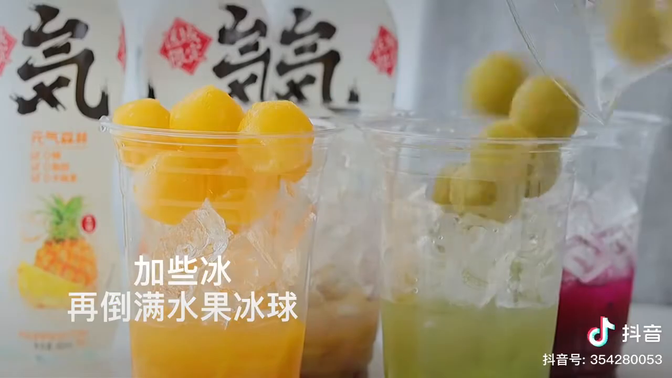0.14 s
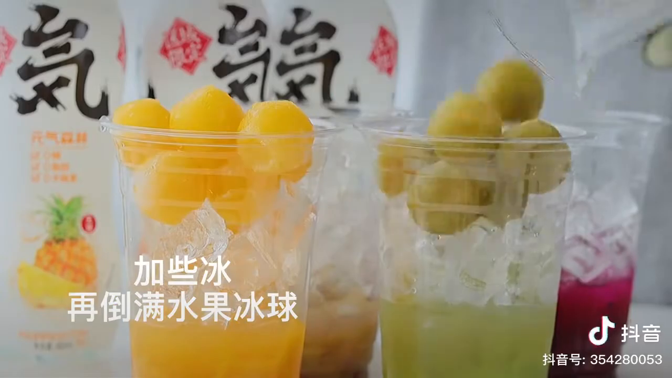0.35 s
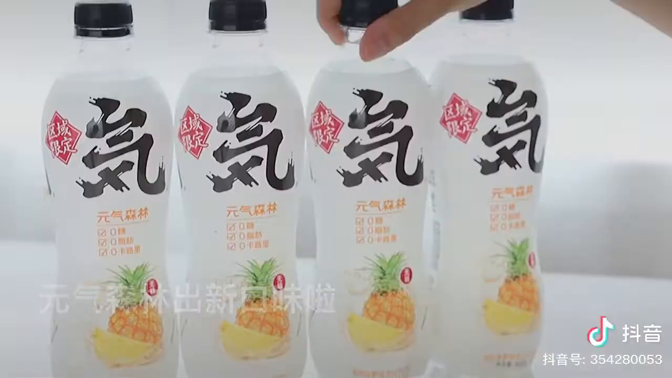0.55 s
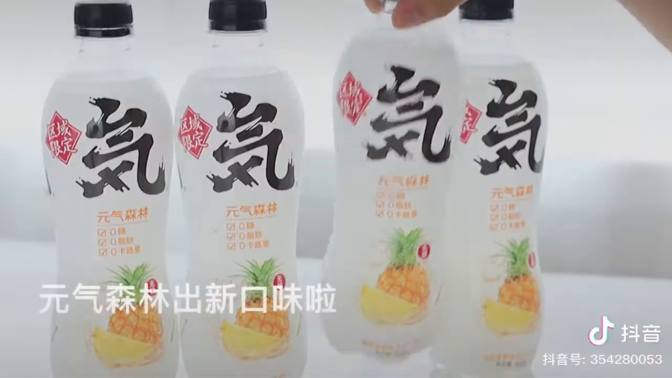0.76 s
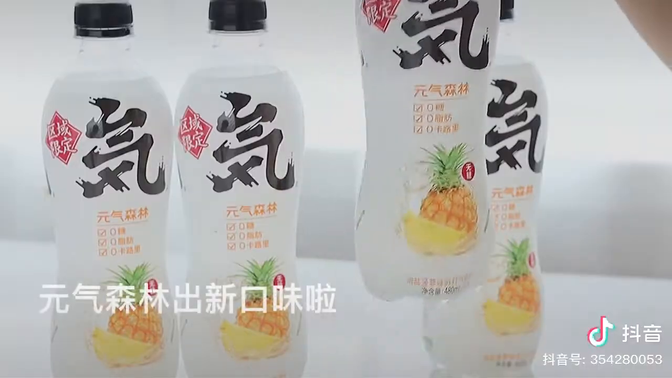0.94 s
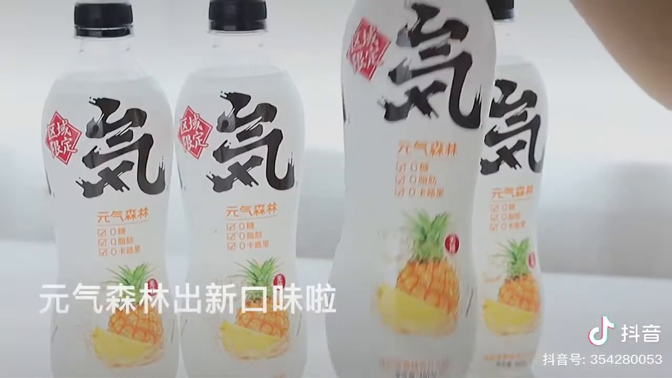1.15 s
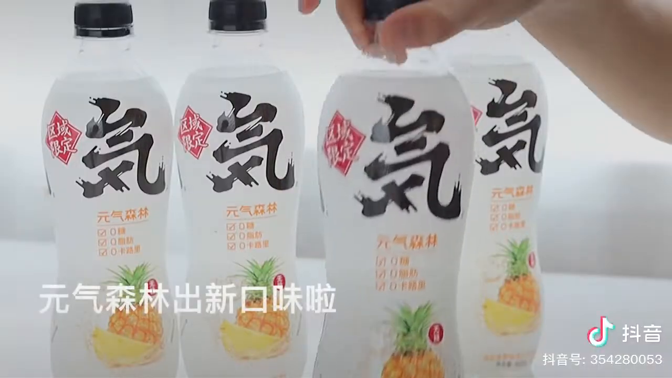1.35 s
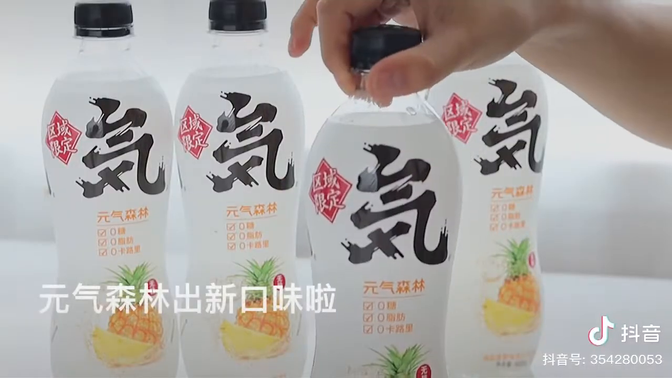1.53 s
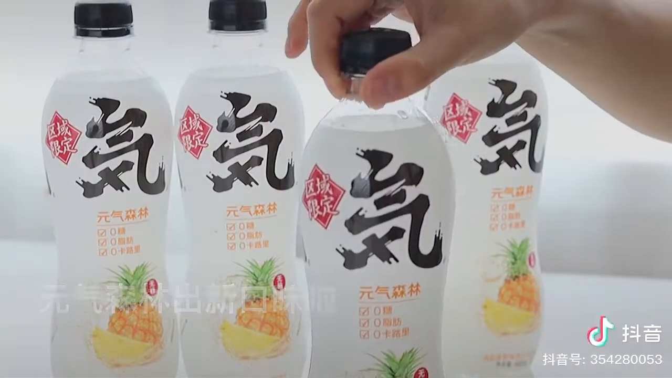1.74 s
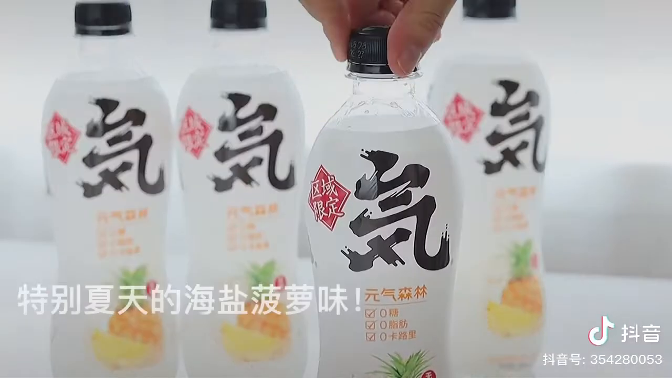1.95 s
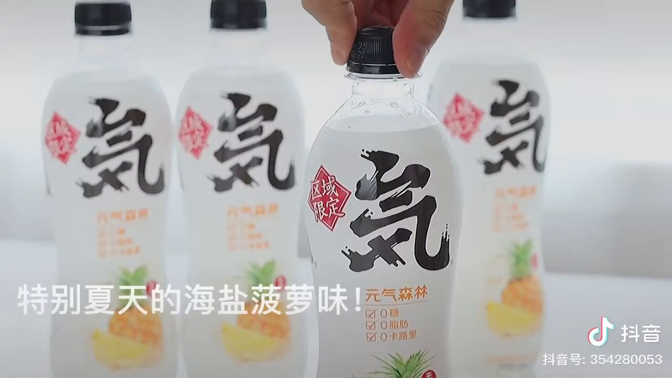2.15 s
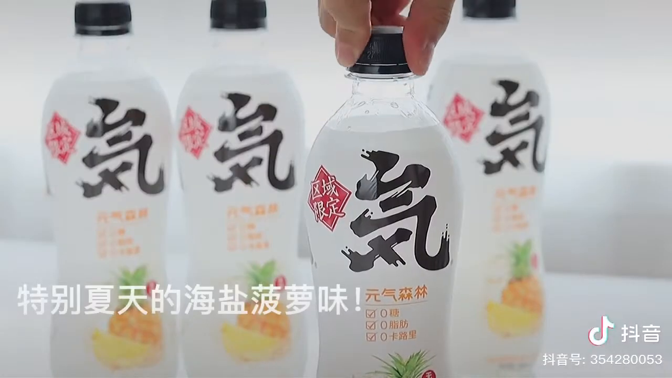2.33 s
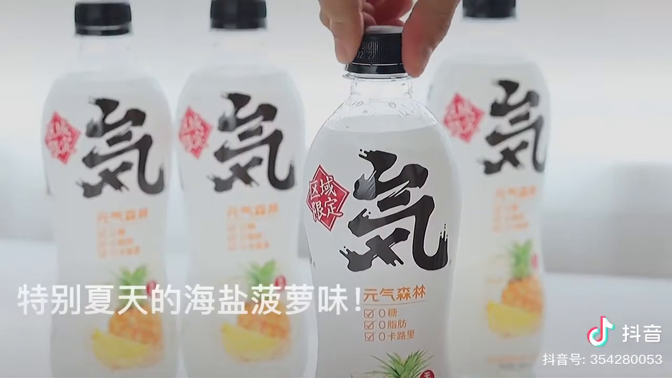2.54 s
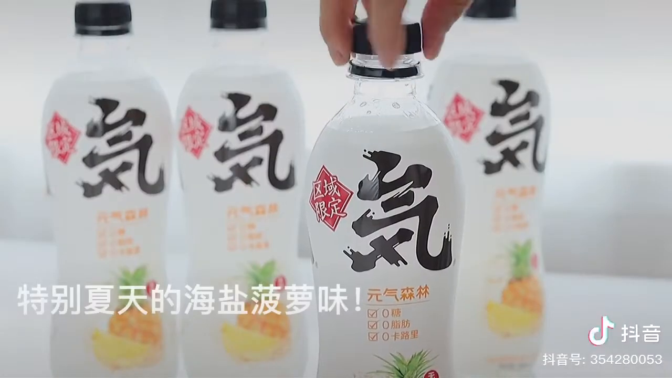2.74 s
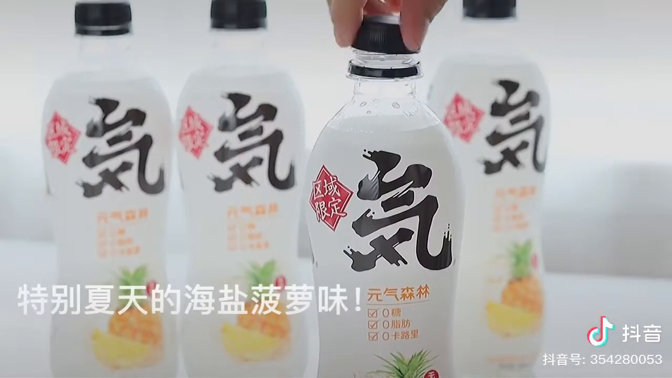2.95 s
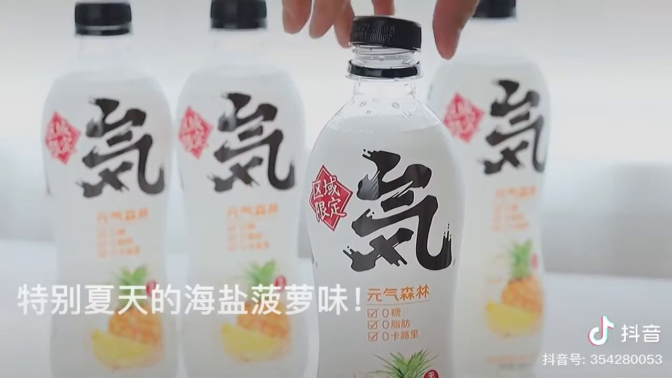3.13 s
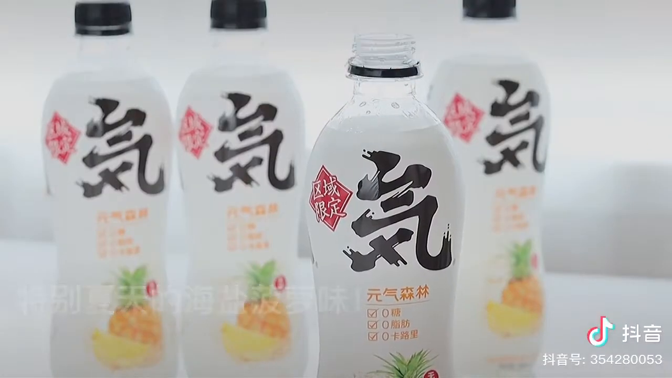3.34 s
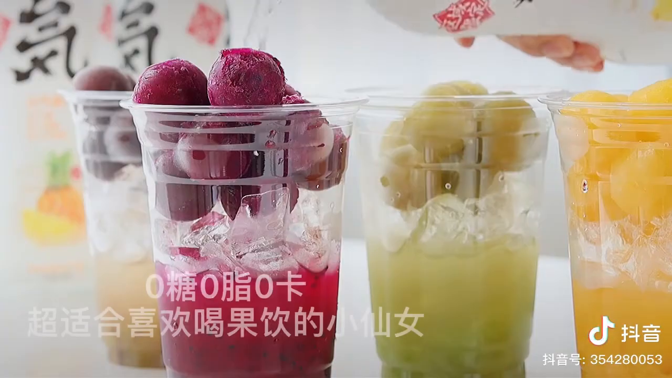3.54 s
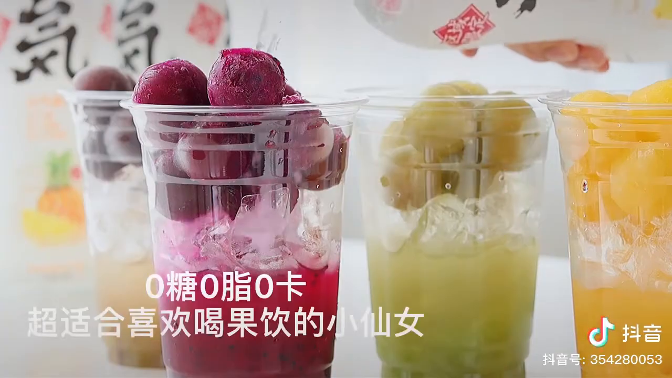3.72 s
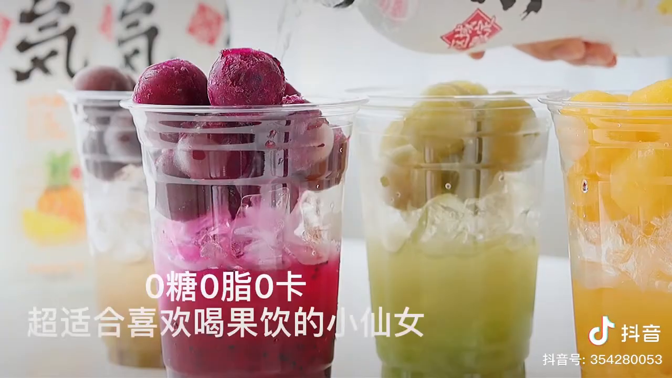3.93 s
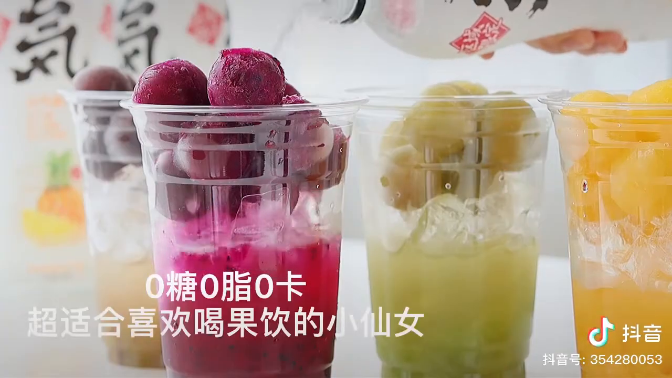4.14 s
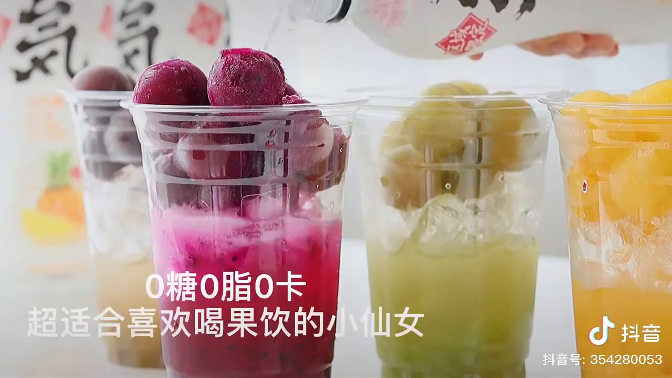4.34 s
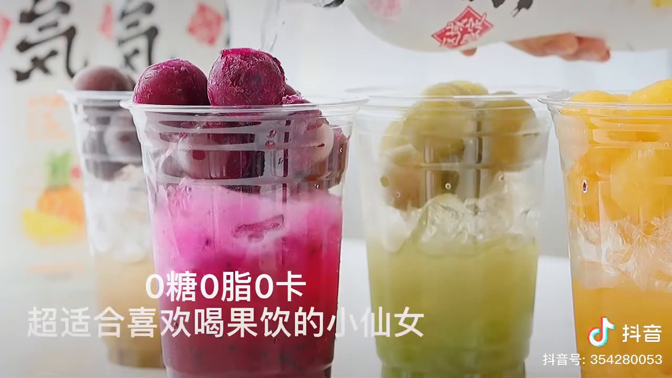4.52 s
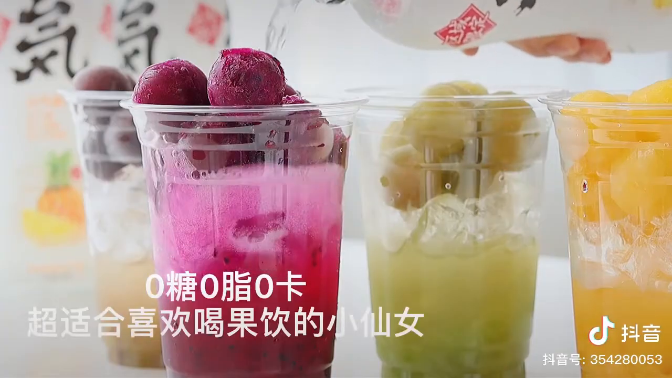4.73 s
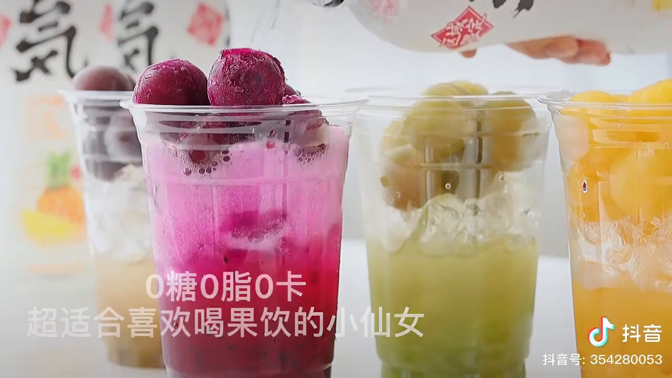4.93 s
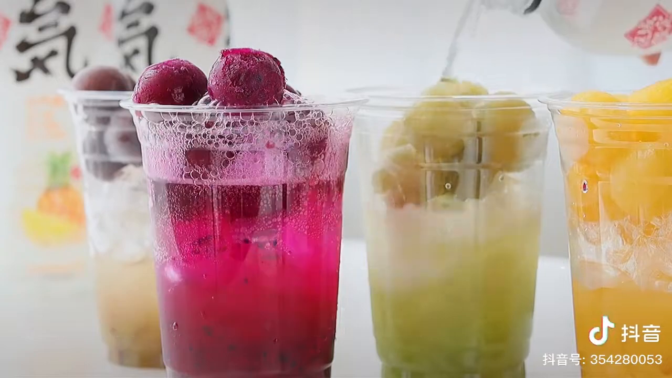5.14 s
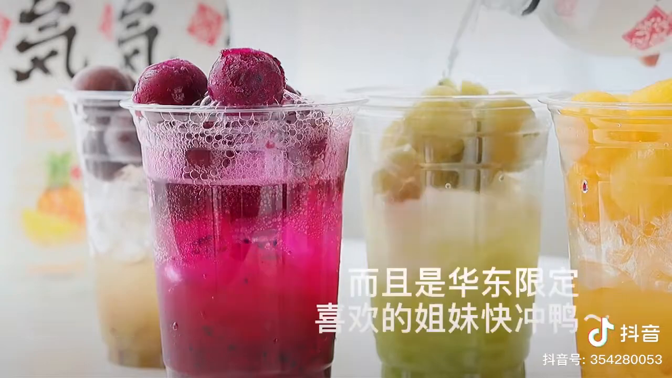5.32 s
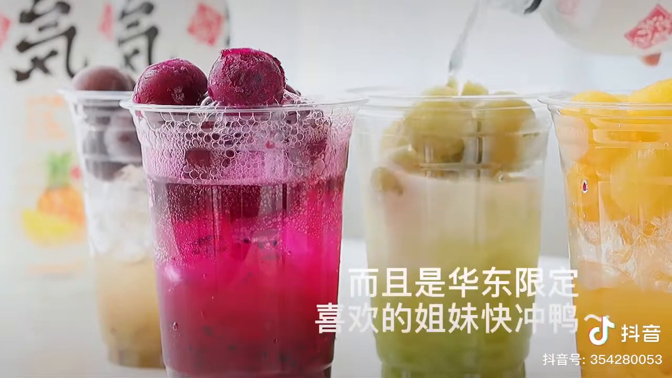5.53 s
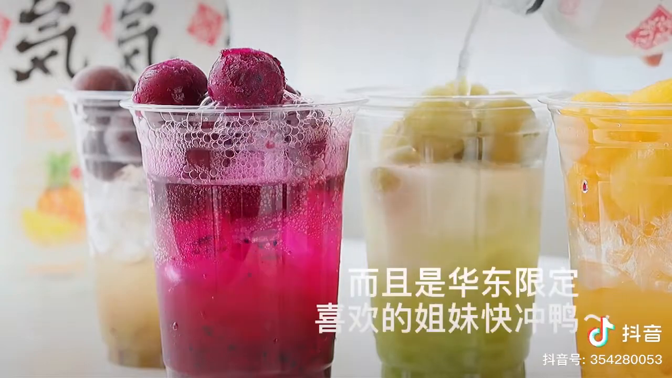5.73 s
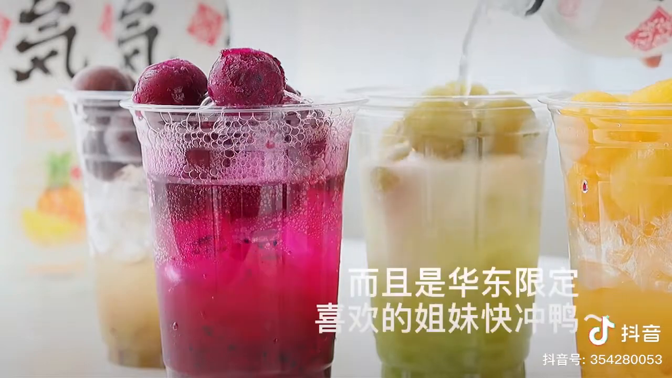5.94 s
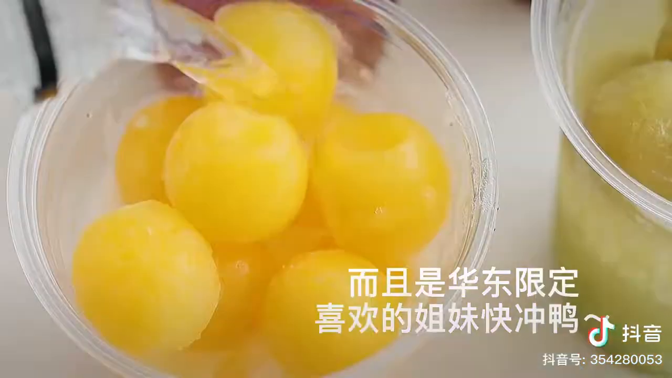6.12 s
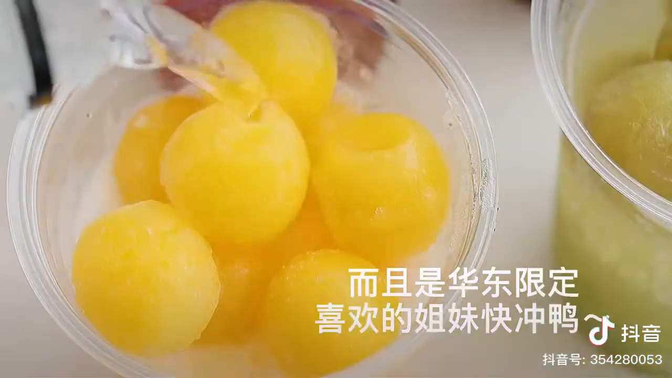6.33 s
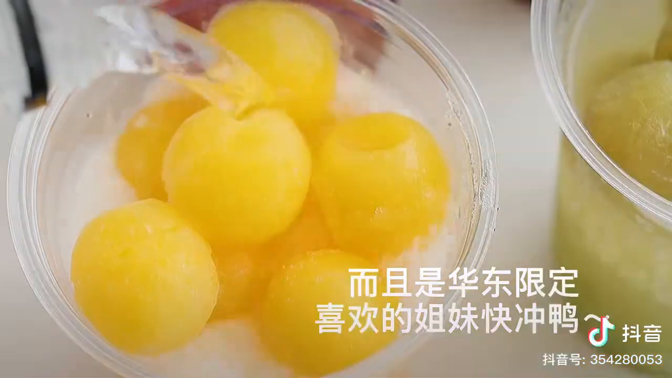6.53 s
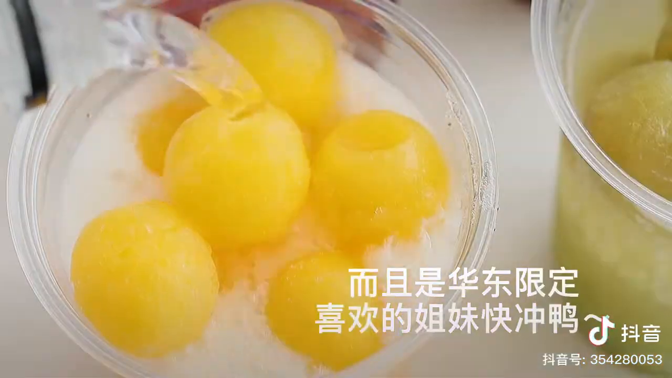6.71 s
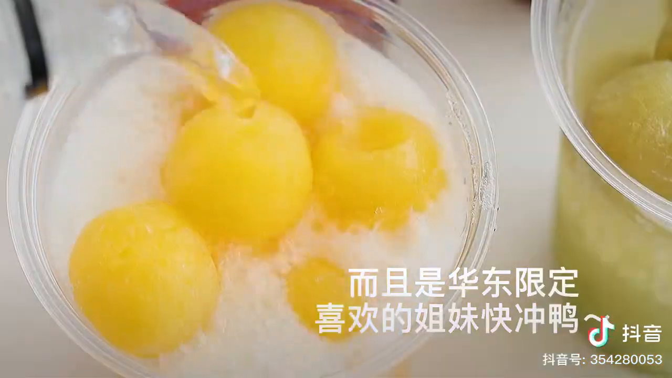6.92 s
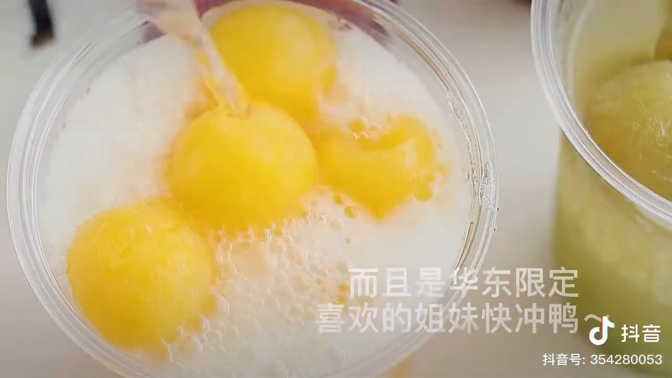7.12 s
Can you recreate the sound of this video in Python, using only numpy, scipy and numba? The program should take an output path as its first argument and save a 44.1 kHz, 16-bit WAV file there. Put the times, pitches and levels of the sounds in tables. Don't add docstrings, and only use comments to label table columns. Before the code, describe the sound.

Very close and dry, frozen fruit balls tumble into a plastic cup of ice with rapid bright knocks and boomy wall thumps. Fingers brush a bottle, it is set down with a thud, then its cap lets out a sharp hiss and cracks as the seal snaps. Sparkling water then glugs over ice in three cups, clinking, gurgling and fizzing ever more densely.

```python
import sys
import numpy as np
from scipy import signal
from scipy.fft import rfft, irfft, next_fast_len
from scipy.io import wavfile
from scipy.ndimage import uniform_filter1d, minimum_filter1d
from numba import njit

SR = 44100
rng = np.random.default_rng(int(sys.argv[2]) if len(sys.argv) > 2 else 0)


def invert_db(x):
    u = np.asarray(x, float) / 20
    return 10 ** u


def inscribe(sig):
    pcm = np.round(np.clip(np.atleast_2d(sig).T, -1, 1) * 32767)
    wavfile.write(sys.argv[1], SR, pcm.astype(np.int16))


N = 320607
TIME = np.arange(N) / SR

# f/Hz, level/dB per Hz
ROOM_TONE = [(42, 3), (62, -3.5), (95, -2), (190, -2.5), (290, -31.5), (530, -24.5), (10200, -49),
             (16000, -44)]
# f/Hz, level/dB
WHINES = [(2468, -66), (8000, -76), (10002, -66.5)]
# t/s, level/dB
RUMBLE = [(0, -28), (.9, -34), (1.51, -37.5), (1.52, -21.5), (1.76, -32.5), (1.95, -30.5), (2.4, -50.5),
          (2.5, -40), (5.3, -48.5), (7.27, -44)]
# t/s, hold/s, depth/dB, recovery/s
DUCKS = [
    (1.515, .01, -50, 0.089),
    (2.2, 0.25, -21, 0.035),
    (2.69, .55, -1, .08),
]
# t/s, fade-in/s, start level/dB
CUTS = [
    (1.762, 0.013, -27),
    (2.6, 0.024, -85),
    (3.38, 0.027, -28),
    (5.077, 0.031, -17),
    (6.022, 0.015, -67),
]

# f/Hz, width/Hz, level/dB
CUP_BODY = [(308, 56, 6.5), (619, 230, 0.5), (1030, 66, 2), (1270, 8.8, -21)]
# f/Hz, width/Hz, level/dB
BOTTLE_BODY = [(251, 76, -7), (331, 16, 5), (378, 46, -6), (545, 68, 0.5), (940, 140, -12)]
# f/Hz, width/Hz, level/dB
NECK_BODY = [(328, 19, -0.5), (385, 33, -4), (538, 38, 1.5), (605, 38, -2.5), (945, 180, -12)]
# f/Hz, width/Hz, level/dB
RUB_BODY = [(1940, 590, 5), (2850, 670, 6.5), (3190, 180, -1), (3520, 100, -9)]
# f/Hz, width/Hz, level/dB
THREAD_GAPS = [(3760, 290, -7), (3900, 70, -6), (6240, 190, -3), (7500, 160, 3), (8300, 160, 0),
               (9200, 140, 1.5), (10200, 270, -1), (11070, 140, 1.5), (14000, 250, -3)]
# f/Hz, level/dB per Hz
SKIN_COLOUR = [(300, 1.5), (1000, -2.5), (4000, 7), (6300, -11), (14000, -46)]
# f/Hz, level/dB per Hz
JET_COLOUR = [(1100, -35), (1800, -15), (3750, 1.5), (4500, -4), (5000, -16), (6800, -2), (8300, 6.5),
              (15500, 3)]
# f/Hz, level/dB per Hz
FIZZ_COLOUR = [(1400, -74), (1960, 1.5), (3190, 10), (3700, 7.5), (4680, -36), (7000, -17.5), (10000, -24),
               (13500, -22)]

# t/s, peak level/dB, ring f/Hz, crack level/dB, t60/s
FRUIT_HITS = [(0.001, -9, 1100, -44, 0.068), (0.028, -5, 1012, -13, 0.035), (0.032, -11, 3200, -9, 0.014),
              (0.059, -12.5, 1270, -25, 0.052), (0.093, -4, 3000, -12, 0.015),
              (0.103, -0.5, 2930, -12, 0.012), (0.124, -15, 775, -25, 0.027),
              (0.142, -3.5, 3060, -35, 0.023), (0.151, -9, 1020, -20, 0.048),
              (0.158, -5.5, 1030, -11, 0.018), (0.164, -3, 3470, -16, 0.014), (0.181, -9, 1270, -14, 0.1),
              (0.2121, 1, 1970, -16, 0.012), (0.231, -4.5, 2850, -24, 0.023),
              (0.262, 1.5, 1790, -16, 0.008), (0.298, -16, 2920, -20, 0.02),
              (0.328, 0.5, 1980, -11.5, 0.013), (0.334, -4.5, 2030, -15, 0.028),
              (0.367, -9, 2920, -18, 0.02), (0.387, -4.5, 2010, -14, 0.014), (0.416, 3, 1950, -16, 0.014),
              (0.441, -15, 2860, -16, 0.016)]
# t/s, hold/s, level/dB, wall boom level/dB, treble level/dB
RATTLE_SPELLS = [(0, 0.034, -18, 0, -5.5), (.06, 0.045, -24, 3, -8), (.125, 0.074, -21, 1.5, -12),
                 (.225, 0.037, -19, 0.5, -13), (.29, 0.016, -39, -4, -14), (.33, 0.045, -21, 0.5, -24),
                 (.4, 0.066, -32, -6, -17), (1.51, .003, -38, -2, -28), (1.585, 0.0086, -44, -3, -30),
                 (1.785, 0.02, -66, 31, -10), (2.63, 0.06, -24.5, -2, -35), (2.73, 0.072, -22.5, -13, -9),
                 (2.89, .005, -28, -1.5, -32), (2.99, 0.025, -35, 0, -17), (3.07, 0.027, -32.5, -10, -30),
                 (3.19, 0.0036, -27.5, 0, -23), (3.24, 0.025, -50, 9, -3)]
# t/s, hold/s, level/dB
BRUSH_SPELLS = [
    (.64, 0.0055, -31.5),
    (1.262, 0.032, -26.5),
]
# t/s, peak level/dB, ring f/Hz, crack level/dB, body level/dB
TABLE_HITS = [
    (1.5143, -12.5, 2400, -28, -5.5),
    (1.571, -28.5, 3100, -24, 1),
    (1.579, -34, 2800, -26, -3),
    (1.589, -35, 3000, -24, 1),
    (1.783, -34.5, 704, -30, 5),
    (1.911, -24.5, 3070, -8, -12),
]
# t/s, jet level/dB
GAS_FLOW = [(1.96, -52), (1.98, -33), (2.03, -26), (2.09, -11.5), (2.227, -12.5), (2.42, -12), (2.46, -18),
            (2.49, -32), (2.6, -27)]
# t/s, peak level/dB, ring f/Hz, crack level/dB, body level/dB
CAP_HITS = [(2.69, 3, 2680, -36, -18), (2.6949, 3.5, 3180, -29, -22), (2.713, -5, 1650, -28, -20),
            (2.718, -2, 2700, -33, -17.5), (2.755, -2.5, 2700, -27, -14), (2.748, -7, 3460, -27, -13),
            (2.775, -7, 2600, -21, -22), (2.787, -11, 3300, -20, -18), (2.793, -1, 2100, -23, -16),
            (2.808, -2, 2850, -25, -40), (2.802, -3.5, 2540, -21, -23), (2.821, -7, 2500, -20, -20),
            (2.832, -10, 2650, -21, -32), (2.84, -4, 1640, -22, -17.5), (2.853, -8, 1840, -26, -9.5),
            (2.895, -23.5, 1300, -30, -14), (2.95, -4.5, 3020, -7, -27), (2.963, -21, 2700, -13, -14),
            (2.998, -3, 3220, -26, -21), (3.004, -5, 1690, -17, -21), (3.028, -9.5, 2800, -29, -27),
            (3.036, -9, 2770, -19, -26), (3.04, -3.5, 2620, -28, -19), (3.063, -14, 2570, -27, -27),
            (3.071, -12, 2640, -33, -13), (3.167, -22, 2900, -17, -22), (3.178, -9, 3320, -29, -17.5),
            (3.199, -11.5, 2640, -36, -14)]
# t/s, peak level/dB, f/Hz
SNAPS = [
    (.2635, -8, 2200),
    (.4175, -5, 2400),
    (2.6918, -4, 2900),
    (2.7192, -6, 2900),
    (2.9521, 1, 2930),
    (3.0055, -3, 2600),
    (3.0412, -2, 3000),
]

# t/s, peak level/dB, ring f/Hz, crack level/dB
ICE_HITS = [(3.5414, -23, 3980, -5), (3.5628, -9, 2630, -20), (3.5987, -5.5, 3700, -23),
            (3.6192, -12, 3750, -17), (3.6630, 1, 3650, -36), (3.606, -8, 4000, -22),
            (3.627, -18, 2590, -20), (3.643, -13, 3220, -22), (3.675, -14, 3300, -25),
            (3.725, -17, 1710, -30), (3.755, -15, 1620, -32), (3.811, -16, 2290, -25),
            (3.875, -17, 3280, -25), (3.891, -17.5, 1800, -25), (3.97, -11, 3100, -25),
            (3.987, -23, 1700, -25), (4.451, -9, 2020, -25), (4.816, -14.5, 2210, -25),
            (3.6685, -4, 3600, -34), (3.719, -7, 2300, -30), (3.739, -9, 3000, -27),
            (3.819, -14, 2490, -25), (3.6865, -2, 3580, -32), (3.7015, 7, 3170, -30),
            (3.7125, 5, 3220, -36), (3.7494, 5, 3230, -36), (3.8496, -8, 3800, -24),
            (3.8631, -6, 3860, -32), (3.9255, 0.5, 3370, -24), (3.936, -10, 3180, -25),
            (4.281, -10, 3200, -25), (4.304, -11, 3250, -8), (4.611, -18, 1800, -19),
            (4.744, -9, 3200, -25), (4.1989, 5, 3520, -28), (4.4478, -5, 3340, -24),
            (4.5082, -9.5, 2050, -29), (4.56, -1, 3430, -29), (4.6796, -13, 3520, -4),
            (5.257, 11, 2360, -28), (5.2794, -3, 1980, -30), (6.0447, -6, 2110, -10.5),
            (6.0621, 1, 2150, -14), (6.93, -7, 2020, -25)]
# t/s, peak level/dB, f/Hz, t60/s, thud level/dB
GLUGS = [(1.52, -18.5, 152, 0.35, 1.5), (1.523, -22, 525, 0.3, -22), (1.596, -16.5, 87, 0.54, -14),
         (1.79, -22.5, 190.4, 0.31, 5), (1.793, -17, 456, 0.1, -20), (2.491, -30.5, 145.6, 0.93, -3.5),
         (3.2, -23.5, 88.7, 0.48, 4.5), (3.256, -24.5, 160.3, 0.45, -19), (3.573, -21.5, 90, 0.34, -12),
         (3.805, -20, 84, 0.29, -14), (4.056, -15.5, 85, 0.15, -14.5), (4.217, -14.5, 88, 0.17, -6),
         (4.372, -13, 84, 0.18, -2), (4.6, -25, 84.5, 0.19, -6.5), (4.807, -16, 265, 0.18, -13),
         (4.962, -25.5, 81.5, 0.19, -11), (5.296, -31.5, 142, 0.37, 4.5)]
# t/s, peak level/dB, f/Hz
CLIMBS = [
    (3.66, -29, 194.5),
    (3.92, -25.5, 196),
]
# t/s, peak level/dB, f/Hz
PLOPS = [(2.554, -31, 1220), (2.579, -26, 1030), (3.008, -6.5, 619), (3.197, -15.5, 594), (6.105, -29, 580),
         (6.19, -29, 900), (6.248, -23, 526), (6.47, -26, 634), (6.489, -24, 757), (6.511, -16.5, 683),
         (6.53, -21, 816), (6.55, -25.5, 623), (6.82, -24, 520), (6.95, -32.5, 520)]
# t/s, peak level/dB, f/Hz
GURGLES = [(3.563, -16.5, 890), (3.583, -15.5, 850), (3.605, -16, 820), (3.627, -19, 800),
           (3.649, -15.5, 837), (3.664, -16, 880), (3.702, -6.5, 836), (3.715, -4.5, 854),
           (3.749, -10, 805), (3.805, -26, 830), (3.812, -11.5, 856), (3.819, -15, 845), (3.855, -5.5, 830),
           (3.863, -10, 790), (3.882, -4, 816), (3.89, -14, 910), (3.917, -1.5, 866), (3.936, -7, 860),
           (3.947, -11, 883), (3.974, -21, 869), (4.012, -13, 730), (4.032, -18, 756), (4.11, -11, 648),
           (4.16, -23, 711), (4.178, -19, 710), (4.217, -22, 907), (4.264, -22, 891), (4.281, -13, 865),
           (4.356, -25, 573), (4.373, -15.5, 517), (4.413, -19, 890), (4.451, -13.5, 920),
           (4.475, -17, 880), (4.498, -14, 710), (4.507, -12, 714), (4.523, 0.5, 728), (4.537, -22, 770),
           (4.561, -27, 754), (4.61, -18, 646), (4.661, -22, 818), (4.676, -5.5, 726), (4.691, -20, 748),
           (4.73, -16.5, 740), (4.798, -29, 738), (4.817, -15.5, 740), (4.991, -26, 816), (5.004, -24, 549)]
# t/s, peak level/dB, f/Hz
PINGS = [(3.450, -11, 14600), (3.481, -32, 7770), (3.519, -24, 11800), (3.534, -24, 7160),
         (3.626, -19, 13240), (3.778, -16, 11000), (3.741, -21, 12400), (3.925, -23, 9290),
         (4.586, -21, 14000), (4.61, -24, 10500), (4.68, -5, 6960), (4.691, -17, 13500), (4.72, -18, 13500),
         (4.982, -16, 11000), (4.998, -14, 12100), (5.095, -21, 7020), (6.046, -20, 6520),
         (6.138, -9, 12300)]
# t/s, peak level/dB, f/Hz
SQUIRTS = [
    (5.022, -8, 3360),
    (3.9, -11, 3000),
    (5.157, -10, 1500),
]
# t/s, foam level/dB, stream level/dB
POUR = [(3.4, -52, -81), (3.52, -49, -76.5), (3.56, -26, -53), (3.76, -33, -33), (3.9, -26.5, -41),
        (4.17, -26, -46), (4.22, -22.5, -33.5), (4.6, -21.5, -28.5), (4.8, -19.5, -41), (5.07, -20, -43),
        (5.2, -24, -27), (5.45, -19, -32.5), (6.02, -14.5, -39), (6.1, -19.5, -24), (6.3, -16.5, -34),
        (6.55, -13, -30.5), (7.27, -14.5, -29)]
# t/s, fizz f/Hz, gurgle f/Hz
FILL = [(3.4, 3870, 847), (4.13, 3560, 709), (5.07, 3300, 774), (5.6, 2850, 933), (6.2, 2460, 710),
        (6.53, 2560, 764), (7.27, 2800, 816)]
# start t/s, spray level/dB, spray missing before foam builds level/dB, gurgle level/dB
CUPS = [
    (3.54, -27, -17.5, -36),
    (5.077, -26, 2, -47),
    (6.025, -22.5, -8, -43),
]
FINEST_MIST_DB = [-1, -3.5, 0]


def unit(x):
    return x / np.sqrt(np.mean(x ** 2))


def noise():
    return rng.standard_normal(N)


def band(x, lo_hz, hi_hz):
    return signal.sosfilt(signal.butter(2, [lo_hz, hi_hz], "band", fs=SR, output="sos"), x)


def colour(x, points, lo_hz=0.99, hi_hz=30000.):
    size = next_fast_len(N)
    hz = np.arange(size // 2 + 1) * SR / size + 1
    f, db = np.transpose(points)
    edge = 1 / np.sqrt((1 + (lo_hz / hz) ** 12) * (1 + (hz / hi_hz) ** 12))
    gain = invert_db(np.interp(np.log(hz), np.log(f), db)) * edge
    return unit(irfft(rfft(x, size) * gain, size)[:N])


def read(table, silent_db=-120):
    s, *columns = np.transpose(table)
    out = np.full((len(columns), N), float(silent_db))
    on = (TIME >= s[0]) & (TIME <= s[-1])
    out[:, on] = [np.interp(TIME[on], s, c) for c in columns]
    return out


def patchy(rate, db):
    k = int(SR / rate)
    steps = np.repeat(rng.standard_normal(N // k + 1), k)[:N]
    return invert_db(db * uniform_filter1d(steps, k))


def grains(rate, spread_db, tail_s):
    clicks = (rng.random(N) < rate / SR) * invert_db(spread_db * rng.exponential(size=N))
    burst = signal.lfilter([1], [1, -np.exp(-1 / (tail_s * SR))], clicks)
    return unit(burst * noise())


def bursts(s, db, tail_s, rise_s):
    envelope = np.zeros(N)
    for start, gain, tail, rise in np.broadcast(s, invert_db(db), tail_s, rise_s):
        first = int(start * SR)
        t = TIME[:min(int(9 * tail * SR) + 9, N - first)]
        swell = np.minimum(t / rise, 1)
        envelope[first:][:len(t)] += gain * swell * np.exp(-np.maximum(t - rise, 0) / tail)
    return envelope * noise()


def modes(x, peaks):
    return sum(invert_db(db) * signal.lfilter(*signal.iirpeak(f, f / max(w, 10), fs=SR), x) for f, w, db in peaks)


@njit
def ring(s, hz, t60, size, glide, rise):
    out = np.zeros(N)
    for e in range(len(s)):
        i0, n = int(s[e] * SR), int(t60[e] * SR) + 2
        p = np.exp(2j * np.pi * hz[e] / SR - np.log(1000.) / n)
        turn = np.exp(2j * np.pi * hz[e] * glide[e] / SR / n)
        z, push = size[e] + 0j, 1 / (rise * SR + 1)
        for i in range(max(i0, 0), min(i0 + n, N)):
            out[i] += z.imag * min((i - i0 + 1) * push, 1.)
            z *= p
            p *= turn
    return out


def spells(table):
    rise_db_s, fall_db_s = 800, 388
    out = 0
    for s, hold, db, *layers in table:
        shape_db = np.minimum(rise_db_s * (TIME - s), 0) - fall_db_s * np.maximum(TIME - s - hold, 0)
        out = out + invert_db(db + shape_db) * invert_db(np.array([0, *layers]))[:, None]
    return out


def contact(table, cycles, soft_db=-12):
    s, db, hz = np.transpose(table)[:3]
    return cycles / hz * invert_db(-1.15 * np.maximum(db, soft_db))


def room():
    duck_db = sum(db * (TIME >= s) * np.exp(-np.maximum(TIME - s - hold, 0) / back)
                  for s, hold, db, back in DUCKS)
    whine = sum(invert_db(db + 1) * np.sin(2 * np.pi * f * TIME) for f, db in WHINES) * (TIME < CUTS[1][0])
    hiss = colour(noise(), ROOM_TONE, lo_hz=261) + invert_db(51) * whine
    rumble = invert_db(read(RUMBLE)[0] + 2) * patchy(8, 1.5) * colour(noise(), ROOM_TONE, hi_hz=335)
    return rumble + invert_db(-44 + duck_db) * hiss


def rattle():
    first_scene_ends_s = .455
    rub, boom, treble = spells(RATTLE_SPELLS) * ((TIME < first_scene_ends_s) | (TIME > 1))
    clicks = grains(3000, 1.1, 0.0014)
    walls = np.where(TIME < 1, unit(modes(clicks, CUP_BODY)), unit(modes(clicks, NECK_BODY)))
    rubbing = colour(modes(clicks, RUB_BODY), [(500, 0), (4000, 0)], hi_hz=3600)
    bright = invert_db(-4) * colour(clicks, FIZZ_COLOUR, lo_hz=5200)
    brush = spells(BRUSH_SPELLS)[0] * colour(grains(1870, 1.5, 0.0028), SKIN_COLOUR)
    return rub * rubbing + boom * walls + treble * bright + brush


def thuds():
    s, db, hz, t60, thud_db = np.transpose(GLUGS)
    return band(bursts(s, db + thud_db + 15.5, 0.13 * t60, 0.014), 42, 255)


def booms(table, body, body_db):
    s, db = np.transpose(table)[:2]
    return modes(bursts(s, db + body_db, 0.016, 0.00059), body)


def knocks(table, t60, tail_db):
    s, db, hz, crack_db = np.transpose(table)[:4]
    t60 = np.clip(t60, .002, .3)
    still = 0 * s
    peak = s + 0.001128
    main = ring(peak, hz, t60, invert_db(db), still, 0.00029)
    main += ring(peak, 1.16 * hz, 0.89 * t60, invert_db(db - 11), still, 0.00057)
    tick = ring(peak, 1.54 * hz, 0.0036 + still, invert_db(db + 0.5 * crack_db), still, 0.)
    crack = bursts(peak, db + crack_db + 6, 0.045 * t60, 0.0002)
    crack = band(band(crack, 3900, 15000), 3700, 16000)
    scatter = bursts(np.maximum(s - .001, 0), db + tail_db, 0.29 * t60, 0.0029)
    return main + tick + crack + band(band(scatter, 1530, 3900), 810, 10000)


def solids():
    fruit, cap, table = np.transpose(FRUIT_HITS), np.transpose(CAP_HITS), np.transpose(TABLE_HITS)
    thread = knocks(CAP_HITS, contact(CAP_HITS, cycles=17, soft_db=-6.5), tail_db=1)
    hits = knocks(FRUIT_HITS, fruit[-1], tail_db=-4)
    hits += thread - .8 * modes(thread, [(5460, 1400, 0)])
    hits += knocks(ICE_HITS, contact(ICE_HITS, cycles=34.4, soft_db=-2.5), tail_db=-16.5)
    hits += knocks(TABLE_HITS, contact(TABLE_HITS, cycles=4.6), tail_db=-2.5)
    wall_db = 7 - 17 * np.log2(fruit[2] / CUP_BODY[2][0])
    walls = booms(FRUIT_HITS, CUP_BODY, wall_db)
    walls += booms(CAP_HITS, NECK_BODY, 21 + cap[-1])
    walls += booms(TABLE_HITS, BOTTLE_BODY, 17.5 + table[-1])
    return hits + band(walls, 85, 2300) + rattle()


def snaps():
    flip_s = .00005

    def swing(at, db, f):
        flip = np.tanh((at - TIME) / flip_s)
        return invert_db(db) * flip * np.exp(-2 * np.pi * f * np.abs(TIME - at))

    s, db, hz = np.transpose(SNAPS)
    bare = sum(swing(at, level_db - 14, f) for at, level_db, f in SNAPS)
    slam = swing(1.5143, 6, 1300)
    return ring(s, hz, 3.2 / hz, invert_db(db + 4), 0 * s, 0.) + bare + slam


def gas():
    full_flow_db, roar_lag_s = -11, 0.021
    high_db = read(GAS_FLOW)[0]
    whistle_db = -21.5 + 0.42 * (high_db - full_flow_db) - 99 * (high_db < -99)
    roar_db = -23 + 1.76 * (np.roll(high_db, int(roar_lag_s * SR)) - full_flow_db)
    jet = noise() * patchy(60, 0.83)
    jet = jet + 0.057 * np.roll(jet, int(0.00099 * SR))
    jet = jet + invert_db(-11.5) * unit(modes(jet, THREAD_GAPS)) * patchy(24.97, 2.9)
    roar = invert_db(roar_db) * colour(jet, JET_COLOUR, hi_hz=2800)
    whistle = invert_db(whistle_db) * colour(jet, JET_COLOUR, lo_hz=3510, hi_hz=5820)
    between = invert_db((whistle_db + roar_db) / 2 - 2.5) * colour(jet, JET_COLOUR, lo_hz=2800, hi_hz=3480)
    return roar + whistle + between + invert_db(high_db) * colour(jet, JET_COLOUR, lo_hz=5940)


def pockets(table, t60, glide, rise_s):
    s, db, hz = np.transpose(table)[:3]
    t60 = np.clip(t60 + 0 * s, .003, .5)
    return ring(s - .5 * rise_s + 0.00187, hz, t60, invert_db(db + 3), glide + 0 * s, rise_s)


def gurgles():
    s, db, hz = np.transpose(GURGLES)
    t60 = 20.2 / hz
    partner = np.transpose([s, db - 14, 1.11 * hz])
    rough = band(bursts(s, db - 1, 0.0053, 0.0019), 640, 910)
    hum = bursts(s, db + 0.5, 0.014, 0.0036)
    rough += band(band(hum, 640, 980), 610, 1010)
    rings = pockets(GURGLES, t60, glide=0.036, rise_s=0.0022)
    return rings + pockets(partner, 0.47 * t60, glide=0.06, rise_s=0.0019) + rough


def trapped_air():
    air = pockets(PLOPS, contact(PLOPS, cycles=11.8), glide=0.059, rise_s=0.00392)
    pings = np.subtract(PINGS, [.0019, -2, 0])
    air += pockets(pings, t60=0.0025, glide=0.082, rise_s=0.00011)
    air += pockets(CLIMBS, t60=0.2, glide=1.58, rise_s=0.0357)
    air += pockets(GLUGS, np.transpose(GLUGS)[3], glide=0.025, rise_s=0.016)
    return air + gurgles() + thuds()


def squirts():
    tails_s, rises_s = (.02, .002, .015), (.025, .001, .004)
    return sum(modes(bursts([s], db + 8, tail, rise), [(hz, 600, 0)])
               for (s, db, hz), tail, rise in zip(SQUIRTS, tails_s, rises_s))


def bubbles(hz, count, spread, cycles, size_db, glide=0.26):
    when, detune, length, size = rng.random((count, 4)).T
    s = 3.4 + when * (N / SR - 3.4)
    pitch = hz[(s * SR).astype(int)] * (1 + spread * (detune - .5))
    t60 = cycles * (2.5 + length) / pitch
    return unit(ring(s, pitch, t60, invert_db(size_db * size), glide + 0 * s, 2.06 / hz[-1]))


def foam():
    foam_builds_s, gurgle_rise_s, ice_covered_s = 0.24, 0.031, 4.65
    foam_db, splash_db = read(POUR)
    hz, gurgle_hz = read(FILL)
    cup = np.maximum(np.searchsorted(np.transpose(CUPS)[0], TIME) - 1, 0)
    start, spray_db, missing_db, gurgle_db = np.transpose(CUPS)[:, cup]
    age = TIME - start
    spray_db = np.where(TIME > POUR[0][0], spray_db + missing_db * np.exp(-age / foam_builds_s), -120)
    covered = np.clip((TIME - ice_covered_s) / 0.22, 0, 1) * (TIME < CUPS[1][0])
    gurgle_db = gurgle_db - 25 * np.exp(-np.maximum(age / gurgle_rise_s, -3)) - 14.5 * covered

    big = bubbles(hz, count=9000, spread=0.32, cycles=7, size_db=-3.5)
    big = colour(big, [(1400, 0), (4200, 0)], lo_hz=1910, hi_hz=5160)
    small = grains(3000, 0.66, 0.01)
    fizz = unit(0.57 * big + colour(small, FIZZ_COLOUR, hi_hz=5500)) * patchy(14, 0.99)
    fizz = fizz * patchy(260, 3.6 * np.clip((4.1 - TIME) / .5, .4, 1))

    mist = grains(5400, 0.82, 0.0077)
    fine = 0.71 * colour(mist, FIZZ_COLOUR, lo_hz=5500, hi_hz=11000) * patchy(9, 1.4)
    finest_gain = 0.56 * invert_db(np.array(FINEST_MIST_DB)[cup])
    finest = finest_gain * colour(mist, FIZZ_COLOUR, lo_hz=11000) * patchy(9, 1.6)
    swell = invert_db(-12.5) * unit(band(noise(), 6190, 7350)) * patchy(4, 3)
    between = invert_db(-10.5) * (TIME < CUTS[-1][0]) * unit(band(mist, 3700, 7040))
    spray = swell + fine + finest + between

    splash = unit(band(band(small, 1620, 3000), 810, 2270)) * patchy(20, 2.1)
    gurgle = bubbles(gurgle_hz, count=2200, spread=.5, cycles=9, size_db=15, glide=.08) * patchy(18, 2.5)
    water = invert_db(foam_db - 1) * fizz + invert_db(spray_db) * spray
    return water + invert_db(splash_db) * splash + invert_db(gurgle_db) * gurgle


def scene():
    solid = solids()
    solid = solid - .92 * modes(solid, [(4850, 1700, 0)])
    water = foam() + squirts()
    water = water - 0.26 * modes(water, [(4940, 790, 0)])
    mid = room() + solid + snaps() + gas() + trapped_air() + water
    return np.array([mid, mid])


def low_pass(x):
    return signal.sosfilt(signal.butter(12, 16500, fs=SR, output="sos"), x)


def record(dry):
    fade_db = np.zeros(N)
    for s, length, db in CUTS:
        fade_db += db * (TIME >= s) * np.clip(1 - (TIME - s) / length, 0, 1)
    bass = signal.sosfiltfilt(signal.butter(2, 350, fs=SR, output="sos"), dry)
    x = bass + (dry - bass) * invert_db(fade_db)

    ceiling, k = 1.32, int(0.00051 * SR)
    limit = 1 / np.maximum(np.abs(x[0]) / ceiling, 1)
    x = x * uniform_filter1d(minimum_filter1d(limit, 2 * k), k)

    x = signal.sosfilt(signal.butter(8, 15900, fs=SR, output="sos"), x)
    x = signal.sosfilt(signal.ellip(8, .5, 30, 15500, fs=SR, output="sos"), x)
    side = invert_db(-44) * noise() * uniform_filter1d(np.abs(x[0]), size=400)
    side += invert_db(-62) * colour(noise(), ROOM_TONE, hi_hz=90)
    mix = np.clip(x + np.array([side, -side]), -1, 1)
    return low_pass(mix)


dry = scene()
out = record(dry)
inscribe(out)
```